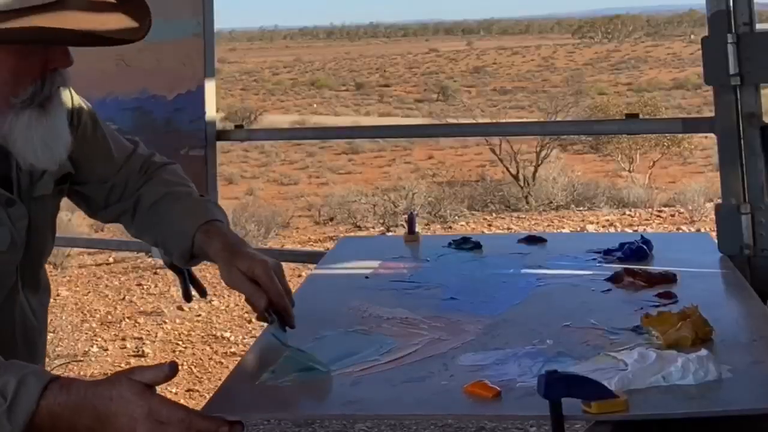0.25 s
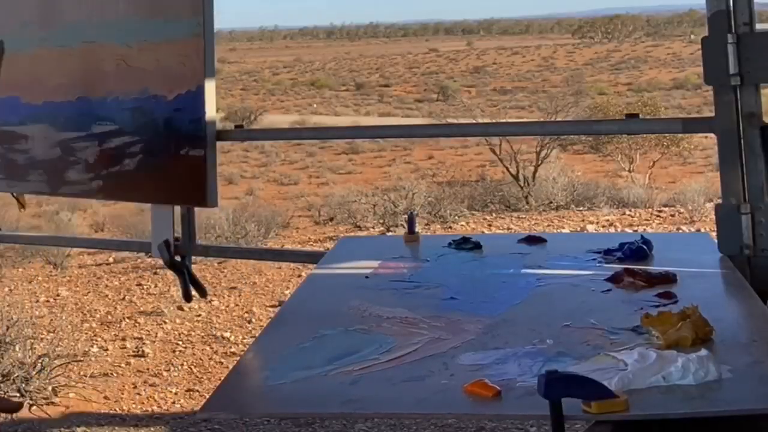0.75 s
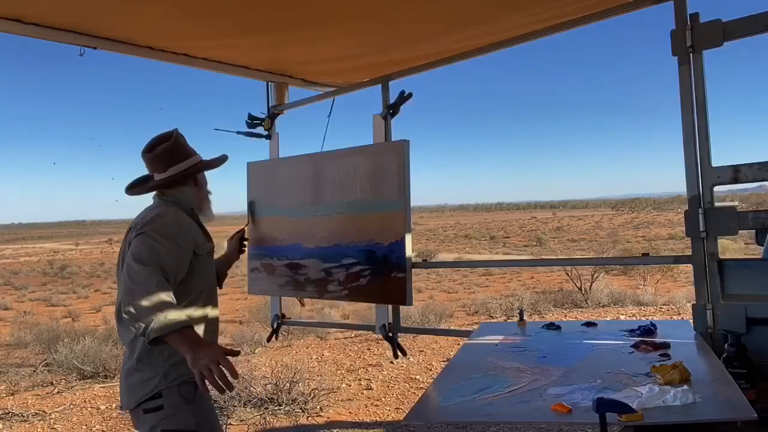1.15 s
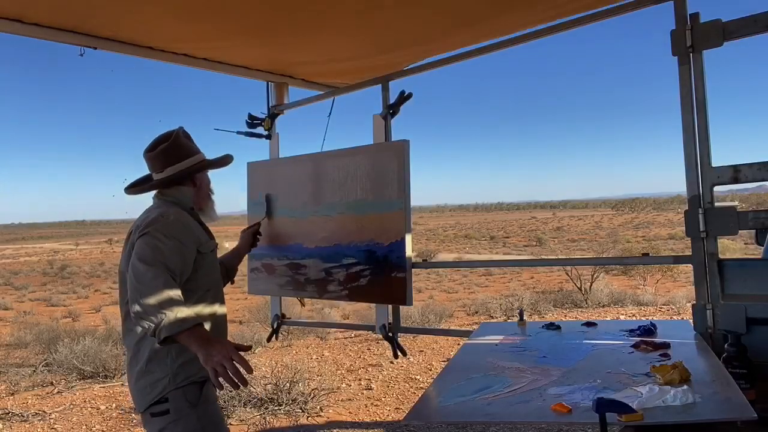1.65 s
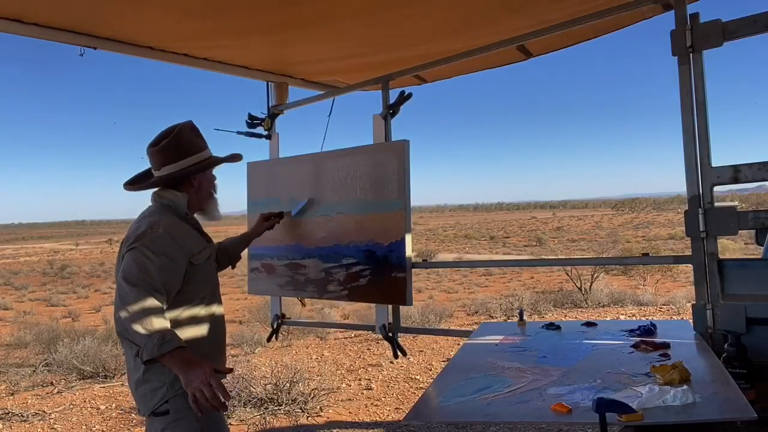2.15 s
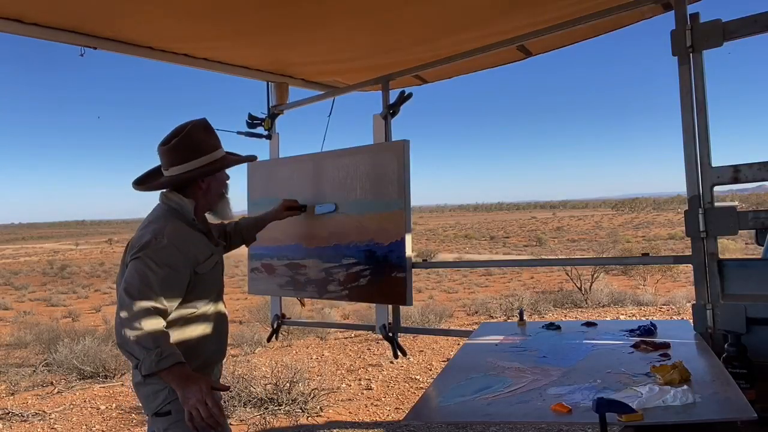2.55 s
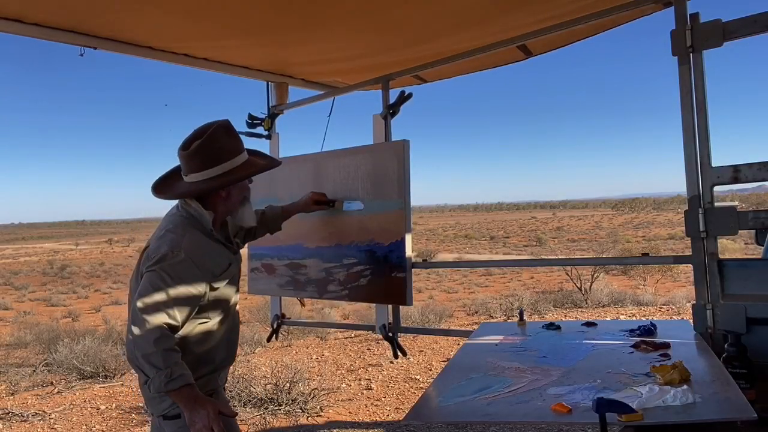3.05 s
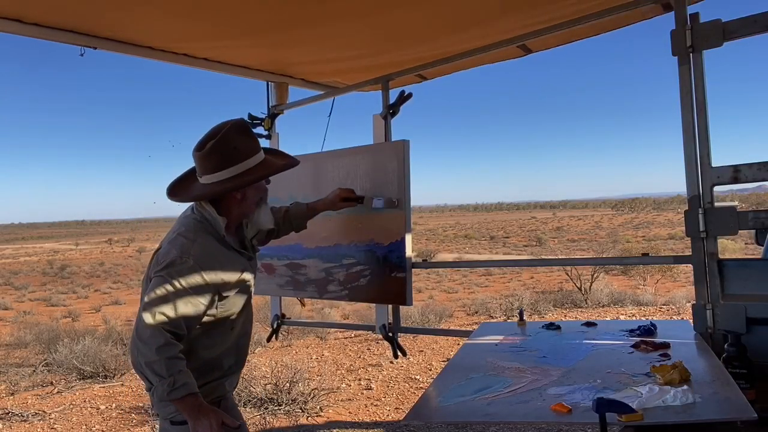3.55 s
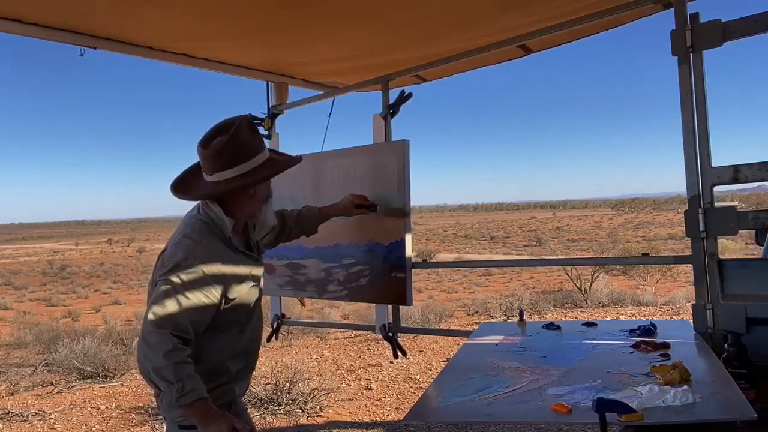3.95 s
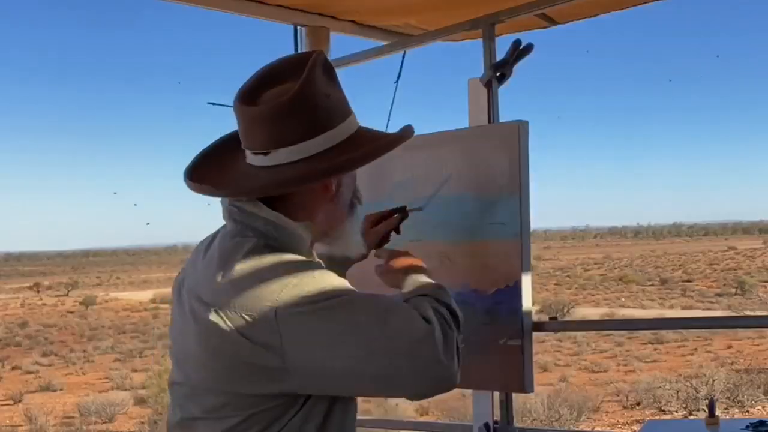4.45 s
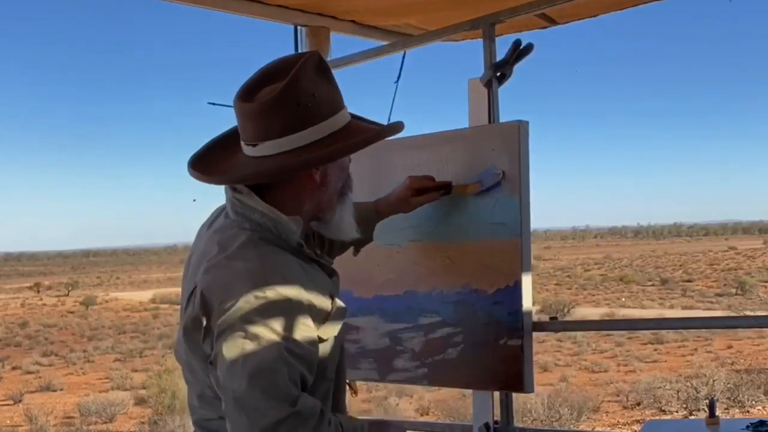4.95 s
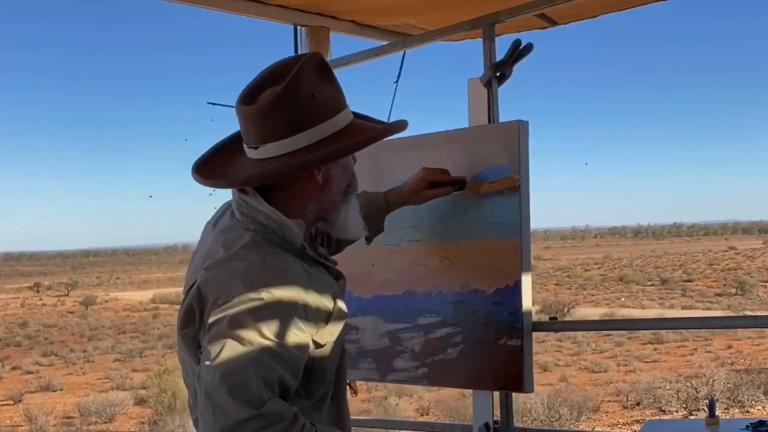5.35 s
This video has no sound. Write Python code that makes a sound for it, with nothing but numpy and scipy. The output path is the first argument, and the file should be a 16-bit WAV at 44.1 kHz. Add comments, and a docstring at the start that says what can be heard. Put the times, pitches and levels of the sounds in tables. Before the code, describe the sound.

Over a low wind rumble, a steel blade makes short, rough scrapes and light clicks, first on a palette, then on stretched canvas.

```python
"""A steel painting knife scrapes a metal palette, then spreads thick paint on a stretched canvas, outdoors
under an awning. Grit under the blade hisses and shakes the surface; the blade taps, flicks and pings, and now
and then makes the frame hoot. Wind rumbles low, something electric hums, and the sound drops out for a moment
at a change of view."""
import sys
import numpy as np
from scipy import signal
from scipy.fft import rfft, irfft, next_fast_len
from scipy.io import wavfile
from scipy.ndimage import uniform_filter1d, map_coordinates

SR = 44100
rng = np.random.default_rng(int(sys.argv[2]) if len(sys.argv) > 2 else 0)


def dump(signal):
    """Clip the signal to [-1, 1] and save it as 16-bit WAV at the path in sys.argv[1]."""
    limited = np.clip(np.atleast_2d(signal).T, -1, 1)
    pcm = np.round(limited * 32767).astype(np.int16)
    wavfile.write(sys.argv[1], SR, pcm)


N = 246959

# strokes and flicks of the blade: (touch s, build-up s, time to fade 20 dB s, blade hiss dB, treble dB, shaking of the surface dB, gain over the build-up dB)
STROKES = [(0.0, 0.034, 0.0869, -36.5, -36.0, -36.5, 6.0), (0.25, 0.054, 0.052, -44, -45, -37.5, -4.5),
           (0.392, 0.025, 0.0925, -80.0, -72.0, -65.5, -1), (0.529, 0.011, 0.14, -83.0, -70.5, -69, 12),
           (0.701, 0.094, 0.075, -67.0, -67.5, -73, -0.5), (0.874, 0.028, 0.06, -62.5, -103.0, -77, 9.0),
           (1.227, 0.063, 0.1055, -34.5, -45.5, -45, 11.0), (1.327, 0.025, 0.0528, -32.0, -27.5, -57, 10.5),
           (1.615, 0.071, 0.1269, -33.0, -40.0, -46, 8.0), (1.724, 0.069, 0.0434, -35.0, -31.0, -50, 11),
           (1.955, 0.033, 0.128, -45, -49.5, -43, 12.0), (2.116, 0.0077, 0.0176, -46.5, -57, -38.0, 24),
           (2.212, 0.054, 0.0523, -44.5, -50.0, -43.0, 22), (2.323, 0.018, 0.027, -48.0, -57, -46, 31),
           (2.422, 0.062, 0.0349, -70.0, -71.0, -61.0, 2.0), (2.532, 0.0048, 0.05, -58, -68.0, -48.0, 18),
           (2.615, 0.023, 0.09, -66.5, -66, -52, 2), (2.721, 0.015, 0.025, -55, -63.5, -56, 6.5),
           (2.783, 0.066, 0.044, -66, -74.5, -57, 0), (2.916, 0.024, 0.035, -59, -51, -48.5, 3),
           (2.976, 0.053, 0.05, -69.5, -66.5, -57.5, 15.0), (3.121, 0.0015, 0.0319, -54, -46, -47.5, 16),
           (3.193, 0.071, 0.08, -65.5, -69.0, -61.0, -1.0), (3.32, 0.016, 0.028, -48.5, -61.5, -50, 29),
           (3.4, 0.072, 0.0561, -60.0, -61.0, -54, 15), (3.511, 0.016, 0.06, -59, -61, -51, 15),
           (3.617, 0.0065, 0.02, -62, -66.5, -61, 22.5), (3.709, 0.017, 0.13, -93.0, -70.5, -86.0, 4),
           (3.833, 0.084, 0.09, -78.5, -75.5, -56, 14.0), (4.043, 0.07, 0.06, -59, -73, -49.5, 3),
           (4.283, 0.051, 0.07, -71.0, -73.5, -57, -5), (4.403, 0.004, 0.4161, -65.0, -70.5, -66, 24.5),
           (4.786, 0.021, 0.0517, -38.0, -45, -44.5, 23), (4.837, 0.014, 0.049, -53.5, -59, -54.5, 9),
           (4.987, 0.039, 0.143, -49, -62.0, -54.5, 9.5), (5.108, 0.00094, 0.0167, -45.5, -66, -44, 26.0),
           (5.19, 0.0065, 0.03, -45.0, -59, -56, 17.0), (5.244, 0.059, 0.07, -41.0, -46.5, -40.5, 23.5),
           (5.478, 0.057, 0.04, -50, -68.0, -43, 18), (5.55, 0.05, .1, -66, -82, -44, 1.5)]
# taps of the blade: (s, click peak dB, thud peak dB, treble against the click dB, ring of the click Hz)
TAPS = [(0.141, -57, -57.5, 10.5, 1800), (0.1545, -55, -56, 17, 1800), (0.177, -52.5, -54.5, 12, 1800), (0.2178, -17, -22, -24, 1900), (0.2222, -11, -21, -38, 1400),
        (0.2258, -10, -20, -40, 1200), (0.2315, -16, -19, -36, 1050), (0.713, -49, -48, 12, 2000), (0.7538, -42.5, -44, -12, 2000),
        (0.82, -52.5, -50, 15, 2000), (0.9053, -44, -46.5, -26.5, 2800), (1.5584, -41, -45, -9.5, 1700), (1.936, -34, -31.5, -3.5, 1700),
        (2.1976, -34.5, -35, -10, 1730), (2.4088, -38.5, -38, -16, 1780), (2.4265, -44, -60, -20, 3700), (2.4544, -55, -31, -10, 1000), (2.6057, -37, -34, -18, 2000),
        (2.7815, -47, -36.5, -18.5, 1630), (2.9402, -37, -28, 0, 2410), (2.976, -54, -37, -20, 1530), (3, -49, -42, -7, 4130), (3.186, -46.5, -43.5, -17, 2330),
        (3.2113, -49, -50, -10, 4000), (3.4288, -49, -52, -12, 4000), (3.614, -46, -31.5, -21, 1500), (3.6247, -45, -50, -15, 4050), (3.7427, -59, -43, 18.5, 5000),
        (3.9545, -39, -32, -23.5, 1500),
        (4.0081, -33, -43, -12, 1300), (4.0431, -37, -45, -24, 2750), (4.2674, -37, -26, -4, 2160), (4.2795, -41.5, -28.5, -15, 4400),
        (4.3803, -58, -58, -11, 2080), (4.587, -46.5, -52.5, -32, 1770), (4.7148, -52.5, -41, -17.5, 1540), (4.7422, -45.5, -49, -24.5, 2200), (4.9714, -34.5, -33, -5.5, 2550),
        (4.9896, -43, -40, -7, 2500), (5.1934, -33, -33.5, -21, 2300), (5.4424, -37.5, -41.5, -12, 2500), (5.4575, -47, -50, -15, 4000)]
# the frame sticks, slips and hoots, and now and then the blade pings high: (start s, pitch Hz, peak dB, length
# s)
HOOTS = [(1.255, 1160, -37.5, 0.0287), (1.254, 1773, -39, 0.032), (2.455, 409.5, -37.5, 0.06), (4.012, 1250, -51, 0.022), (2.455, 475, -42, 0.055), (3.904, 4500, -66, 0.03), (3.915, 4000, -64, 0.03), (3.912, 990, -51, 0.04), (5.485, 2450, -60, 0.04), (3.83, 1014, -55, 0.122), (3.894, 997, -42.5, 0.016), (4.049, 404, -40, 0.058), (.05, 2820, -33, 0.027), (0.264, 2538, -36, 0.029), (2.124, 1300, -42.5, 0.0179), (4.808, 2700, -33.5, 0.0192), (5.456, 387, -35, 0.075), (5.545, 640, -46, 0.05), (5.459, 650, -45.5, 0.041)]
PALETTE = [(167.3, 13, -0.5), (259, 17, 0.5), (441, 19.4, 4.5), (627.8, 31, -1), (1022, 90, -5.5), (1270, 240, -14), (1640, 45, -14.5), (1930, 38, -5.5)]  # metal sheet: (Hz, width Hz, dB)
CANVAS = [(108.5, 29, 4.5), (278, 51, 1.5), (401.6, 49, -5), (515, 38, -3), (664.4, 50, -14), (988, 74, -8)]  # cloth and frame: (Hz, width Hz, dB)
# the free length of the blade sings differently from grip to grip: (from s, Hz, width Hz, dB over the plain hiss)
BLADE = [(0, 2652, 500, -0.5), (1.101, 3727, 900, 2), (1.9, 2394, 600, -6.5), (3.4, 2280, 595.5, 0), (4.42, 2410, 500, 2.5)]
HISS = [(600, -11.5), (1000, -7), (1150, -1.5), (2000, 0), (3500, -3.5), (5500, -1.5), (9500, 0), (12500, -8), (13700, -18)]  # grit under the edge: (Hz, dB per Hz)
WIND = [(0.0, -43.5), (0.2, -45.5), (0.42, -48), (0.98, -53.5), (2.01, -49), (2.14, -44), (2.65, -46.5), (3.2, -44),
        (3.66, -49.5), (4.09, -44.5), (4.2, -48.5), (4.33, -46.5), (4.55, -52.5), (4.96, -47.5), (5.6, -48.5)]  # (s, dB)
RUMBLE = [(15, -58), (25, -21), (43, -2), (80, 3.5), (134, -2.5), (253, -9.5), (316, -12), (484, -30), (1500, -60),
          (1950, -97), (3300, -120)]  # wind: (Hz, dB per Hz)
HUM = [(48.4, -56), (145.3, -59.5), (242.2, -60), (344.5, -73)]  # odd overtones: (Hz, dB)
WIDTH = [(60, -8), (150, -14.5), (370, -5.5), (700, 2), (1200, -1.5), (2260, -5), (4500, -0.5), (8000, -19.5), (12500, 3)]  # knife: (Hz, side against mid dB)
DROPOUT = [(4.385, 0), (4.399, -14), (4.403, -45), (4.421, -45), (4.426, -16), (4.45, 0)]  # (s, dB)  # fixed
MOVE_S = .42  # the knife leaves the palette  # fixed
TOP_HZ = 14200  # fixed
TIME = np.arange(N) / SR
WIND_WIDTH = [(30, -7), (125, -9.5), (500, 3)]  # wind: (Hz, side against mid dB)
LAND_DB_PER_S, FADE_POWER = 950, 1.77  # how fast a touch sets in; the fade starts gently and steepens
TREBLE_SWING, SHAKE_SWING = 1.17, 0.72  # the treble follows the hiss with wider swings, the shaking with narrower ones
# faint rubbing between the strokes: (s, hiss dB, treble dB, shaking dB)
RUB = [(0.15, -71, -72, -64.5), (0.9, -68.5, -74.0, -61.5), (1.02, -83, -85.0, -65.0),
       (1.9, -81, -79.5, -62), (2.1, -87.0, -100.0, -53.0), (3.0, -90.0, -87, -60.0),
       (4.1, -92.0, -84.0, -58.5), (4.25, -87, -87.5, -65.5), (4.9, -71.5, -84.0, -62.5),
       (5.4, -94, -87.5, -60.0)]
MS = np.arange(0, N / SR + .002, .001)  # time in steps of a millisecond  # fixed
TIP = 7  # the tip's first contact against the rattle after it
LIFT_DB = 25  # once the fade is done the blade leaves the surface and the sound breaks off
CLICK_Q = 4  # sharpness of a click's ring


def amp(db):
    """Gain of a level in dB."""
    return 10 ** (np.asarray(db) / 20)


def unit(x):
    """x at rms 1."""
    return x / np.sqrt(np.mean(x ** 2) + 1e-20)


def along(points, hz):
    """(Hz, value) points on a log axis."""
    f, v = np.transpose(points)
    return np.interp(np.log(hz + 1), np.log(f + 1), v)


def curves(rows):
    """One value per sample for each column after the time."""
    s, *cols = np.transpose(rows)
    return [np.interp(TIME, s, c) for c in cols]


def wobble(rate):
    """A smooth random curve, rate knots a second."""
    return map_coordinates(rng.standard_normal(int(N * rate / SR) + 4), [TIME * rate])


def filtered(x, response):
    """x times a complex response of frequency."""
    m = next_fast_len(x.shape[-1] + 8192)
    return irfft(rfft(x, m) * response(np.fft.rfftfreq(m, 1 / SR)), m)[..., :x.shape[-1]]


def modes(table, between_db, widen):
    """Causal response of resonances over a flat path."""
    return lambda f: amp(between_db) + sum((-1) ** k * amp(db) * 1j * f * w * widen / (c * c - f * f + 1j * f * w * widen) for k, (c, w, db) in enumerate(table))


SHEET, CLOTH = modes(PALETTE, between_db=-14.5, widen=0.73), modes(CANVAS, between_db=-17, widen=1.76)


def band(lo_hz, hi_hz):
    """Causal band-pass, 12 dB an octave on each side."""
    return lambda f: (1j * f / (lo_hz + 1j * f) * hi_hz / (hi_hz + 1j * f)) ** 2


def grit(per_s, spread_db, smooth):
    """Random specks of uneven size on a bed of smooth friction noise."""
    specks = (rng.random(N) < per_s / SR) * amp(spread_db * rng.exponential(1, N)) * rng.standard_normal(N)
    return unit(specks) + smooth * rng.standard_normal(N)


def surface(push):
    """The palette rings under the first strokes, the canvas under the rest."""
    return filtered(push * (TIME < MOVE_S), SHEET) + filtered(push * (TIME >= MOVE_S), CLOTH)


def strokes():
    """Grit excites the blade and the surface; every stroke follows one gesture."""
    hiss, treble, shake = pressure()
    judder = amp(.8 * wobble(39) + 1.1 * wobble(160))  # the edge catches unevenly
    low, high = split(patchy(filtered(grit(6000, 1.8, smooth=0.92), lambda f: amp(along(HISS, f))), patchy_db=4.0), 4570)
    drag = unit(surface(patchy(filtered(grit(900, 2.08, smooth=1.0), band(412, 900)), patchy_db=3.0)))
    return judder * (hiss * blade(low) + treble * unit(high)) + amp(.9 * wobble(35)) * shake * drag


def taps():
    """Each touch is a short ringing crack of the blade and a thud of the surface; harder taps rattle longer."""
    out, t = np.zeros(N), np.arange(SR // 5) / SR  # fixed
    for s, db, thud_db, treble_db, hz in TAPS:
        t60 = 0.03 + 0.0004 * max(db + 52.0, 0)
        rise = 1 - np.exp(-t / np.array([[0.0003], [.0002], [0.0008]]))  # the flat of the blade lands after its tip
        burst = rng.standard_normal((3, len(t))) * rise * amp(-60 * t / [[t60], [0.8 * t60], [1.5 * t60]])
        burst[:2, 0] = TIP
        body = SHEET if s < MOVE_S else CLOTH
        ring = modes([(hz, hz / CLICK_Q, 0)], between_db=-13, widen=1)
        parts = filtered(burst, lambda f: np.array([band(500, 1.9 * hz)(f) * ring(f), band(4500, 15000)(f), band(110, 700)(f) * body(f)]))
        add(out, s, amp([db, db + treble_db, thud_db]) / np.abs(parts).max(axis=1) @ parts)
    return out


def hoots():
    """Short unsteady tones; the higher, the rougher."""
    out, waver, drift = np.zeros(N), amp(2.1 * wobble(110)), 0.6 * wobble(90)
    for s, hz, db, length in HOOTS:
        shape = swell(length)[:N - round(s * SR)] ** .6
        here = slice(round(s * SR), round(s * SR) + len(shape))
        out[here] += amp(db) * shape * waver[here] * np.sin(2 * np.pi * hz * TIME[here] + drift[here] * hz / 700)
    return out


def wind():
    """Lumpy low rumble, as mid and side."""
    level_db, = curves(WIND)
    mid, side = amp(level_db + 2.3 * wobble(7) + 2.16 * wobble(22.01)) * unit(filtered(rng.standard_normal((2, N)), lambda f: amp(along(RUMBLE, f))))
    return mid, filtered(side, lambda f: amp(along(WIND_WIDTH, f)))


def hum():
    """Steady low tones that waver together."""
    drift = 0.18 * wobble(2.8)
    return amp(0.59 * wobble(9.3)) * sum(np.sqrt(2) * amp(db) * np.sin(2 * np.pi * hz * TIME + drift) for hz, db in HUM)


def patchy(x, patchy_db):
    """Resonances come and go as the blade flexes: random gain patches in time and frequency."""
    z = signal.stft(x, nperseg=512)[2]
    field = uniform_filter1d(uniform_filter1d(rng.standard_normal(z.shape), size=2, axis=0), size=7, axis=1)
    return signal.istft(z * amp(patchy_db * unit(field)), nperseg=512)[1][:N]


def split(x, edge_hz):
    """Parts of x under and over a frequency."""
    return filtered(x, lambda f: np.array([1 / (1 + (f / edge_hz) ** 6), 1 - 1 / (1 + (f / edge_hz) ** 6)]))


def scattered(x, step):
    """Near surfaces scatter the sound within milliseconds, anew each time the knife has moved."""
    out, t = np.zeros(N + SR), np.arange(SR // 20) / SR
    for start in range(0, N, step):
        echoes = rng.standard_normal(len(t)) * amp(-60 * t / 0.04)
        part = signal.fftconvolve(x[start:start + step], echoes / np.linalg.norm(echoes))
        out[start:][:len(part)] += part
    return out[:N]


def blade(x):
    """Each grip passes the friction through its own resonance."""
    ends = [round(s * SR) for s, *_ in BLADE[1:]] + [N]  # fixed
    starts = [0] + ends[:-1]  # fixed
    return np.concatenate([unit(filtered(x[a:b], modes([mode], between_db=1.5, widen=0.82))) for a, b, (s, *mode) in zip(starts, ends, BLADE)])


def add(track, s, sound):
    """Mixes a short sound into a track at a time in seconds."""
    part = track[..., round(s * SR):][..., :sound.shape[-1]]
    part += sound[..., :part.shape[-1]]


def swell(length):
    """Half a sine wave: a gesture that grows and fades."""
    return np.sin(np.pi * np.arange(round(length * SR)) / (length * SR))


def gesture(touch, build, fade, gain_db):
    """Level against the peak in dB: a quick landing, a steady build-up, a steepening fade, a sudden lift."""
    t = MS - touch
    rising = gain_db * (np.clip(t / build, 0, 1) - 1) + LAND_DB_PER_S * np.minimum(t, 0)
    faded = np.maximum(t - build, 0) / max(fade, .005)  # fixed
    return rising - 20 * faded ** FADE_POWER - LIFT_DB * np.maximum(faded - .95, 0)


def pressure():
    """Gains of hiss, treble and shaking: all strokes over the faint rubbing."""
    swing = np.c_[[1, TREBLE_SWING, SHAKE_SWING]]
    firm = sum(amp(np.c_[level_db] + swing * gesture(touch, build, fade, gain_db)) for touch, build, fade, *level_db, gain_db in STROKES)
    return amp(curves(RUB)) + [np.interp(TIME, MS, gain) for gain in firm]


def scene():
    """The scattered sound of the knife differs at the two microphones."""
    knife = strokes() + taps() + hoots()
    mid, side = wind()
    side = side + filtered(scattered(knife, SR // 4), lambda f: amp(along(WIDTH, f)))
    mid = mid + knife + hum()
    return np.array([mid + side, mid - side]) * amp([[-.4], [.4]])


def record(dry):
    """The sound drops out once; nothing is kept above the band limit."""
    return filtered(dry * amp(curves(DROPOUT)[0]), lambda hz: 1 / (1 + (hz / TOP_HZ) ** 150))  # fixed


dry = scene()
out = record(dry)
dump(out)
```